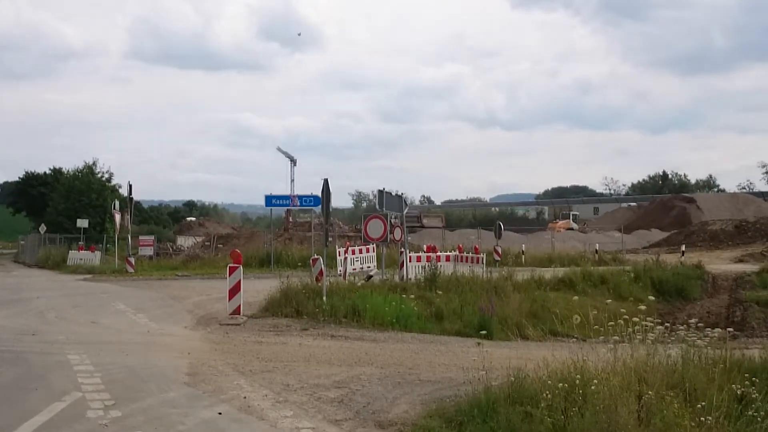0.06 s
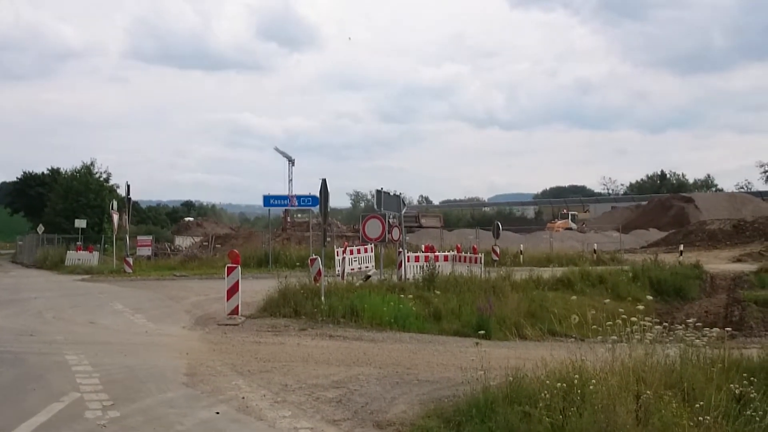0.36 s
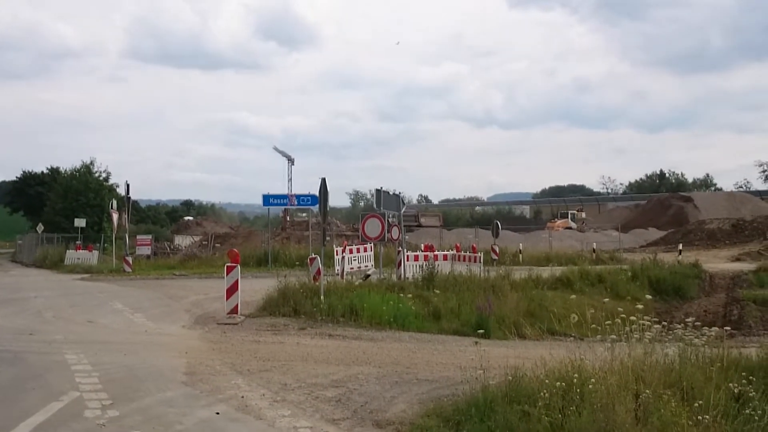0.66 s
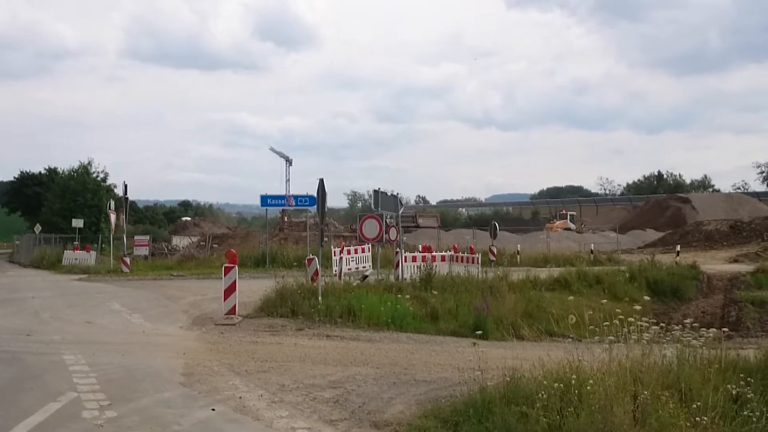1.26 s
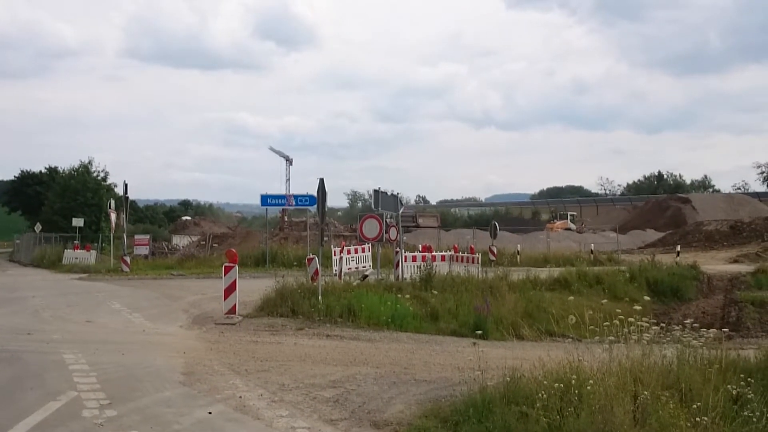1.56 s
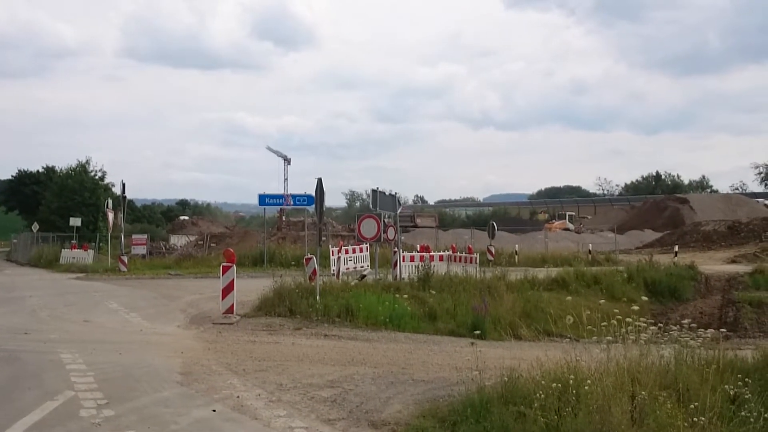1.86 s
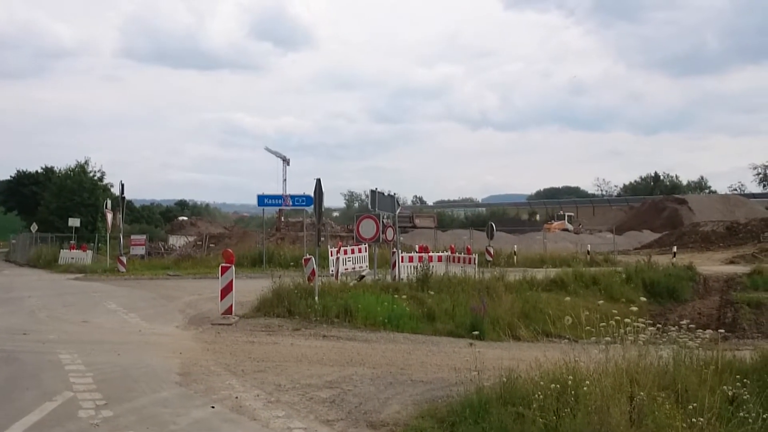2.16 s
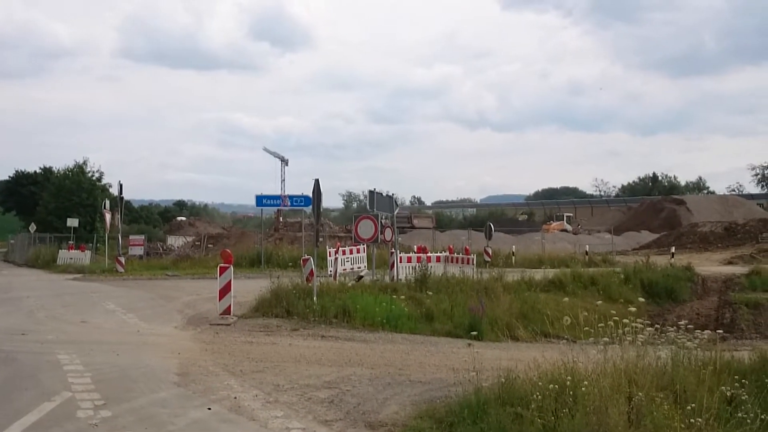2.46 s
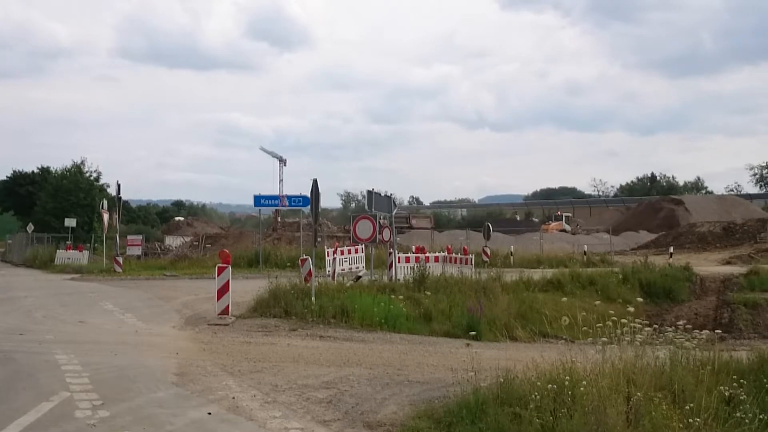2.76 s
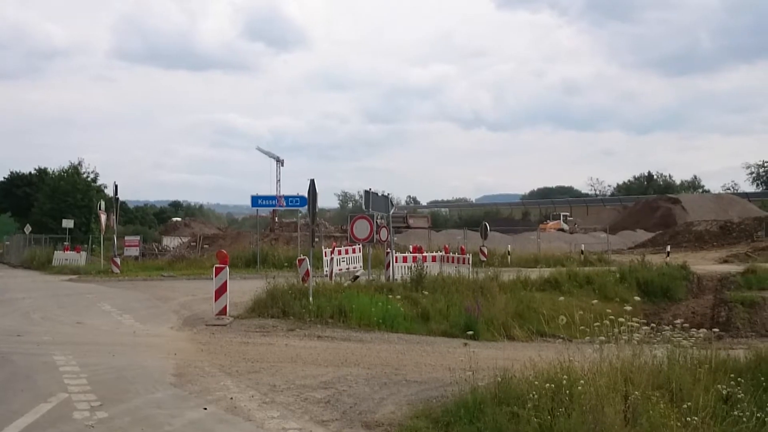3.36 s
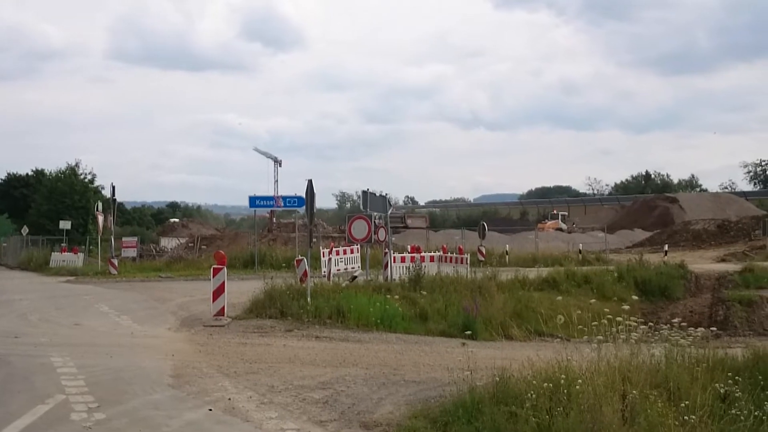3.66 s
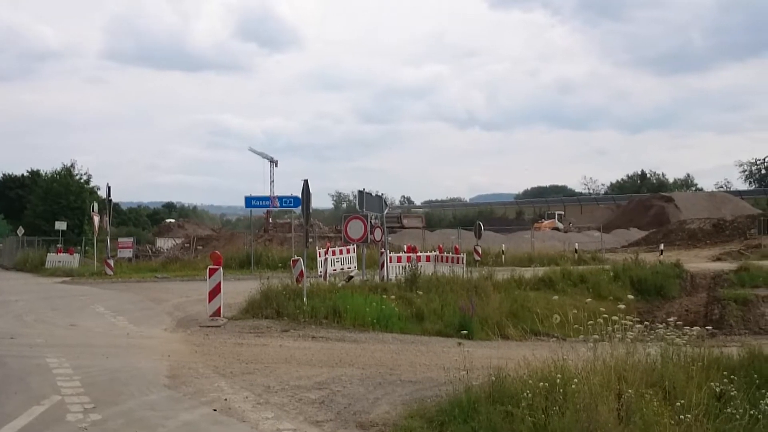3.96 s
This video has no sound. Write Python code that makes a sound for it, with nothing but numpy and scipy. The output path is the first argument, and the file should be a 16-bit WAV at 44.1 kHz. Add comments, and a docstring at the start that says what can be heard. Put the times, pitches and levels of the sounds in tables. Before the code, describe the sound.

Distant traffic rumbles throughout, a far car's tyre noise swelling gently and fading after 2.5 seconds. Wind buffets the microphone's right side, strongest in the first half second with a soft knock and faint grass rustle, returning around 1.1, 2.7 and 3.9 seconds. Far construction machines throb and whine, more from 2 seconds. A small bird chirps faintly near 1.4, 2.7 and 3.2 seconds over a thin hiss.

```python
"""A distant car passes in open country, its tyre noise swelling and fading over a low traffic rumble.
Far machines at a road works throb and whine. Gusts buffet the right microphone port (its opening),
with one soft knock, and grass rustles briefly. A small bird chips far off.
The recorder adds its own narrow hiss."""
import sys
import numpy as np
from scipy import signal
from scipy.fft import rfft, irfft
from scipy.io import wavfile

SR = 44100
rng = np.random.default_rng(int(sys.argv[2]) if len(sys.argv) > 2 else 0)


def to_wav(s):
    """Save 16-bit WAV."""
    ch = np.atleast_2d(s).T  # columns
    pcm = np.round(np.clip(ch, -1, 1) * 32767)  # PCM
    wavfile.write(sys.argv[1], SR, pcm.astype(np.int16))


N = 176400
T = np.arange(N) / SR  # time of each sample, s
F = np.maximum(np.arange(N // 2 + 1) * SR / N, 1)  # frequency of each point in a spectrum, Hz


# Traffic noise, low to high, before the car's swell: f/Hz, level/dB per Hz
TRAFFIC_SPECTRUM = [(8, -53.5), (25, -60.5), (58, -57), (76, -64), (105, -66.5), (140, -71), (200, -77.5),
                    (300, -82.5), (480, -86), (660, -80.5), (830, -82.5), (990, -80), (1110, -76.5),
                    (1380, -74.5), (1560, -79), (1950, -77), (2230, -79), (2400, -81), (2750, -86.5),
                    (2970, -88), (3400, -94), (4000, -98.5), (5000, -106), (8000, -116), (16000, -130)]
# Centres of five bands, a steady low one and the four that swell: f/Hz
BAND_CENTRES = [350, 756, 1310, 1890, 2820]
# Boost of those four bands as the car goes by: t/s, body/dB, roar/dB, upper roar/dB, hiss/dB
CAR_SWELL = [(0, 2.5, -5, -3.5, -6), (.4, 0.5, 2, -6.5, -7.5), (.9, 0.5, 1, -2.5, -8),
             (1.4, -1, -1, -0.5, -4), (2, -1, -1, 1, -3), (2.25, -1, -1.5, -0.5, -1),
             (2.55, -0.5, -1.5, -2, -1), (3, -1.5, -4.5, -3.5, -2), (3.5, -0.5, -5, -4, -2),
             (4, 0, -7, -6, -5)]

def traffic(flutter_db=1.0):
    """Rumble and tyre noise; the roar peaks first, the hiss follows, and the air makes each band waver."""
    spectrum = at_ports(white(), white()) * amp(over_hz(*np.array(TRAFFIC_SPECTRUM).T))
    times, *curves = np.array(CAR_SWELL).T
    swells_db = [0] + [np.interp(T, times, curve) for curve in curves]
    out = np.zeros((2, N))
    for one_band, db in zip(np.eye(len(swells_db)), swells_db):
        band = irfft(spectrum * over_hz(BAND_CENTRES, one_band), N)
        out += band * amp(db + flutter_db * drift(11))
    return out


# Engine tones that never stop: f/Hz, level/dB, wander/share of the pitch
ENGINE_DRONES = [(26.7, -39.5, .015), (45.7, -43, .015), (245, -72, .006), (327.5, -68.5, .005),
                 (366, -67.7, .006), (396.5, -69.5, .003)]
# Machine tones that swell and fade: peak t/s, half length/s, f/Hz, level/dB, glide/Hz per s
MACHINE_WHINES = [(2.82, .36, 112.5, -44.5, 5), (2.15, .25, 107.5, -51, 9), (1.15, .3, 107, -51, -12),
                  (.05, .15, 88, -47, 0), (1.6, .2, 92, -51, 0), (3.3, .18, 90, -50, -12),
                  (3.7, .2, 115, -52, 0), (3.95, .07, 77, -38, 0), (3.32, .35, 580.5, -59, -1),
                  (2.15, .6, 583, -66, -3), (3.78, .085, 635, -55.8, 5), (3.58, .06, 632, -61, 0),
                  (3.24, .06, 634, -63, 0), (3, .07, 630, -63, 0), (.05, .25, 552, -62, 0)]

def machines():
    """Far engines throb low and whine faintly at the road works."""
    out = sum(amp(db) * engine_tone(hz, wander) for hz, db, wander in ENGINE_DRONES)
    for peak, half, hz, db, glide in MACHINE_WHINES:
        out += amp(db) * swell(peak, half) * engine_tone(hz + glide * (T - peak), wander=.0015)
    return irfft(at_ports(rfft(out)), N)


def engine_tone(hz, wander, flutter_db=1.5):
    """An engine tone that wanders in pitch and flutters in the moving air."""
    pitch = hz * (1 + wander * drift(4.3))
    return np.sqrt(2) * sine(pitch) * amp(flutter_db * drift(2.2))


# Puffs of wind: start t/s, time until fading/s, right level/dB, top f/Hz
WIND_BUFFETS = [(-.02, 0.032, -24.5, 142), (0.201, 0.0082, -21, 262), (.222, 0.024, -26, 170),
                (0.273, 0.009, -18.5, 111), (0.293, 0.028, -21.5, 204), (0.337, 0.048, -25, 210),
                (0.431, 0.062, -27, 225), (0.504, 0.02, -24, 119), (0.663, 0.016, -26, 88),
                (0.833, .02, -29, 70), (1.08, 0.014, -29.5, 76), (1.134, 0.022, -27, 75),
                (1.185, 0.023, -25.5, 83), (2.431, 0.04, -29, 111), (2.532, 0.07, -38, 170),
                (2.728, 0.017, -24, 129), (2.768, 0.055, -31.5, 149), (3.866, 0.086, -37.5, 203),
                (3.916, .1, -25, 178)]

def wind(attack_s=.00415, release_s=.013, left_db=-50, sharpness=2):
    """Swirls of air hit the right port as short dull thumps; faster air makes higher ones."""
    out = np.zeros(N)
    for start, length, db, top_hz in WIND_BUFFETS:
        rise = np.sin(np.pi / 2 * np.clip((T - start) / attack_s, 0, 1)) ** 2
        envelope = rise * np.exp(-np.maximum(T - start - length, 0) / release_s)
        ratio = F / (.5 * top_hz)  # strongest near half the top frequency
        hump = 1 / np.hypot(1, sharpness * (ratio - 1 / ratio))
        treble_cut = 1 / np.hypot(1, (F / top_hz) ** 3.14)
        swirl = envelope * noise(hump * treble_cut)
        swirl *= np.sqrt(np.sum(envelope ** 2) / np.sum(swirl ** 2))  # chance does not set its energy
        out += amp(db) * swirl
    return np.array([amp(left_db) * out, out])


def port_knock(at_s=.3813, decay_s=.00005, ring_hz=5900):
    """One soft knock among the gusts makes the right port ring."""
    blow = amp(-9) * (T >= at_s) * np.exp(-np.abs(T - at_s) / decay_s)
    knock = signal.lfilter(*signal.butter(4, 2150, fs=SR), blow)  # dulled above 2150 Hz
    ring = signal.lfilter(*signal.iirpeak(ring_hz, Q=10, fs=SR), blow)
    return np.array([np.zeros(N), knock + amp(-5) * ring])


# Bird calls: t/s, length/s, start f/Hz, end f/Hz, left level/dB, right level/dB, roughness/share of pitch
BIRD_CHIPS = [(.06, .1, 3620, 3590, -68, -71, .02), (.245, .11, 3600, 3590, -67, -68, .02),
              (1.345, .035, 6600, 5400, -57, -56, .06), (1.368, .025, 5300, 5000, -58, -54, .04),
              (2.695, .04, 5600, 5050, -72, -54, .04), (3.225, .04, 5600, 5100, -74, -57, .04)]

def bird():
    """A small bird gives thin, rough chips and whistles that fall in pitch."""
    out = np.zeros((2, N))
    for start, length, high_hz, low_hz, left_db, right_db, roughness in BIRD_CHIPS:
        progress = np.clip((T - start) / length, 0, 1)
        pitch = (high_hz + (low_hz - high_hz) * progress) * (1 + roughness * drift(580))
        out += amp([[left_db], [right_db]]) * np.sin(np.pi * progress) * sine(pitch)
    return out


# One rustle of grass: peak t/s, half length/s, left level/dB, right level/dB
GRASS_RUSTLE = (.25, .2, -67.5, -74)

def grass(centre_hz=4800, sharpness=1.4, flicker_db=1.5):
    """Grass gives a faint, flickering hiss as the strongest gust goes through."""
    peak, half, left_db, right_db = GRASS_RUSTLE
    colour = 1 / (1 + (sharpness * (F / centre_hz - centre_hz / F)) ** 2)
    envelope = swell(peak, half) * amp(flicker_db * drift(30))
    return envelope * np.array([amp(db) * noise(colour) for db in (left_db, right_db)])


# How the two ports hear far sound: f/Hz, left minus right level/dB, left lead/rad, likeness/0-1
PORT_RESPONSE = [(25, -10, 1.0, .93), (60, -7.5, .88, .92), (120, -3.5, .7, .92), (280, 0, .45, .92),
                 (380, .5, -.15, .87), (500, 3, .3, .68), (620, 1.8, .55, .78), (820, .5, .45, .5),
                 (1050, 2.6, 1.5, .77), (1400, 3.5, 1.9, .89), (1750, 7, 2.5, .9), (1950, 6.5, 2.45, .88),
                 (2170, 4, 3.1, .9), (2450, 8, 3.8, .45), (2800, 2, 3.8, .45), (3400, -3.5, 8.9, .7),
                 (4200, -1, 9.5, .5)]

def at_ports(direct, scattered=None):
    """Left and right spectra of a far sound; the scattered part makes the two sides less alike."""
    hz, balance_db, lead, likeness = np.array(PORT_RESPONSE).T
    pair = np.array([direct, direct])
    sides = np.array([[1], [-1]])
    if scattered is not None:
        alike = np.clip(over_hz(hz, likeness), 0, 1)
        pair = direct * np.sqrt((1 + alike) / 2) + sides * scattered * np.sqrt((1 - alike) / 2)
    gains = amp(sides * over_hz(hz, balance_db) / 2)
    gains /= np.sqrt(np.mean(gains ** 2, axis=0))  # keep the total power
    return pair * gains * np.exp(.5j * sides * over_hz(hz, lead))


def amp(db):
    """Turn decibels into a number to multiply by."""
    return 10 ** (np.asarray(db) / 20)


def over_hz(hz, values):
    """Join points into a curve over frequency, with every octave equally wide."""
    return np.interp(np.log(F), np.log(hz), values)


def sine(hz):
    """A pure tone that follows a changing pitch."""
    return np.sin(2 * np.pi * np.cumsum(hz) / SR)


def swell(peak_s, half_s):
    """A bell-shaped rise and fall, down to 37% at half_s either side of the peak."""
    return np.exp(-((T - peak_s) / half_s) ** 2)


def white():
    """Spectrum of white noise at 0 dB per Hz."""
    return rfft(rng.standard_normal(N)) * np.sqrt(SR / 2)


def noise(colour):
    """Noise of typical size 1; colour says how strong each frequency is."""
    x = irfft(white() * colour, N)
    return x / x.std()


def drift(rate_hz):
    """A smooth random wobble of typical size 1; a higher rate wobbles faster."""
    return noise(np.exp(-(F / rate_hz) ** 2) * (np.arange(len(F)) > 0))


def scene():
    """Everything that reaches the two ports."""
    return traffic() + machines() + wind() + port_knock() + bird() + grass()


# The recorder's own noise: f/Hz, left level/dB per Hz, right level/dB per Hz
RECORDER_HISS = [(1000, -106, -100), (3000, -104, -100), (4070, -104, -98.5), (5200, -105, -96),
                 (5400, -107, -89.5), (6130, -108, -86.5), (6080, -108, -90.5), (7020, -108, -104),
                 (8200, -108, -111), (10160, -115, -117), (11200, -113, -115), (11800, -116, -117),
                 (14000, -109, -113), (14800, -113, -110), (15800, -113, -102)]

def record(dry, top_hz=15750):
    """The recorder adds its hiss, strongest on the right, and cuts the highest treble."""
    hz, *channels = np.array(RECORDER_HISS).T
    hiss = np.array([irfft(white() * amp(over_hz(hz, db)), N) for db in channels])
    treble_cut = signal.ellip(12, .2, 80, top_hz, fs=SR, output="sos")
    return signal.sosfilt(treble_cut, dry + hiss)


dry = scene()
out = record(dry)
to_wav(out)
```